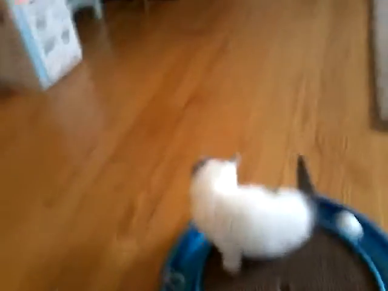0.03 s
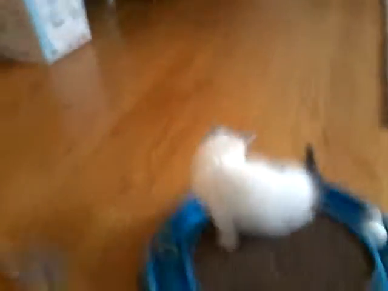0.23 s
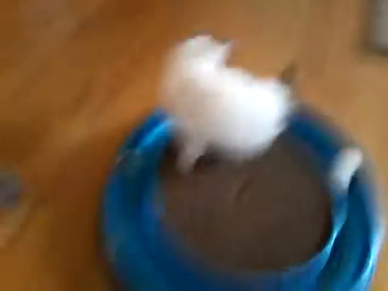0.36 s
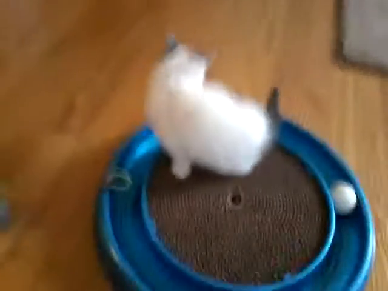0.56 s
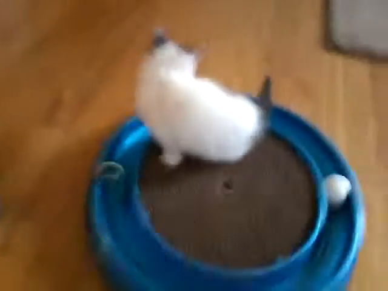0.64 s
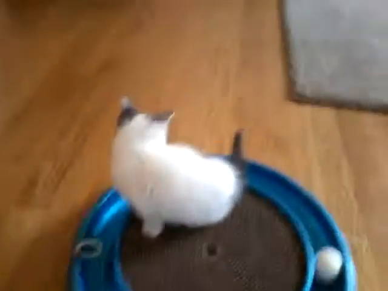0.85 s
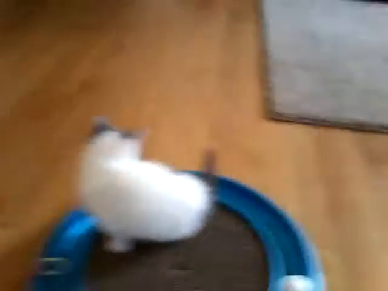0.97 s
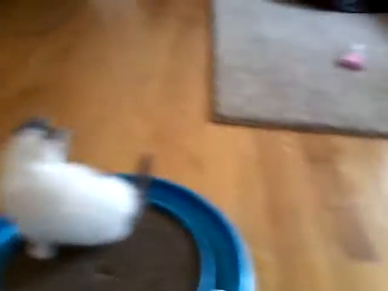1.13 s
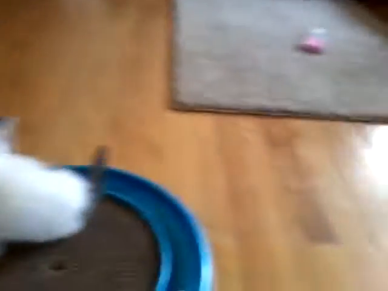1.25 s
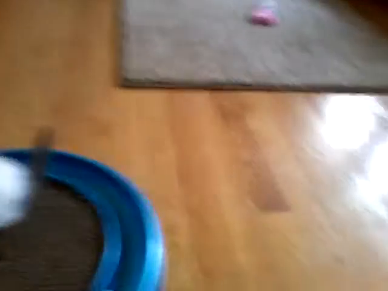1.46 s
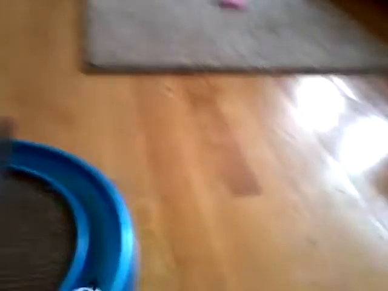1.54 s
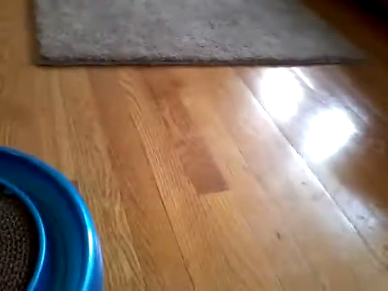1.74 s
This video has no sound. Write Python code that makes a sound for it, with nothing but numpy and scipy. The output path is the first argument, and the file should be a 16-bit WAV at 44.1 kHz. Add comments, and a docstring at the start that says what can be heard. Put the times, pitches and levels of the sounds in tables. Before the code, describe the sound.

Fingers scrape and bump a hand-held camera, then two taps and a ball rolls along plastic track

```python
"""Fingers shift on the case of a hand-held camera: gritty scrapes past the microphone, soft thumps, small ticks.
Then come two light taps on a plastic track, and a hollow ball skids, bounces and rolls off along it.
Underneath lie a thin rising squeak, a faint swelling hiss and a quiet room with a wavering hum.
Friction is shaped noise, blows ring banks of resonances, and squeak and hum are sines."""
import sys
import numpy as np
from scipy import signal
from scipy.fft import rfft, irfft, next_fast_len
from scipy.io import wavfile
from scipy.ndimage import map_coordinates

SR = 44100
rng = np.random.default_rng(int(sys.argv[2]) if len(sys.argv) > 2 else 0)


def to_wav(sig):
    """Store sig (one row per channel, or 1-D mono) as 16-bit WAV at the path in sys.argv[1].

    Samples outside -1..1 are clipped; the rate is SR.
    """
    pcm = np.clip(np.atleast_2d(sig), -1, 1) * 32767
    pcm = np.round(pcm).astype(np.int16)
    wavfile.write(sys.argv[1], SR, pcm.T)  # frames by channels


N = 79380  # length in samples


def amp(db):
    """Decibels to a linear factor."""
    return 10 ** (np.asarray(db) / 20)


def unit(x):
    """Scale to rms 1."""
    return x / np.sqrt(np.mean(x ** 2) + 1e-20)


def noise():
    """White noise for the whole scene."""
    return rng.standard_normal(N)


def along(points, hz):
    """Read (Hz, value) points on a log frequency axis."""
    f, values = np.transpose(points)
    return np.interp(np.log(hz + 1), np.log(f + 1), values)


def curves(rows, outside=-120):
    """One value per sample for each column after the time."""
    s, *columns = np.transpose(rows)
    t = np.arange(N) / SR
    return [np.interp(t, s, column, left=outside, right=outside) for column in columns]


def wobble(rate):
    """A smooth random curve with this many knots a second."""
    knots = rng.standard_normal(int(N * rate / SR) + 4)
    return map_coordinates(knots, [np.arange(N) * rate / SR])


def filtered(x, response):
    """Multiply the spectrum of x by a complex response of frequency."""
    m = next_fast_len(N + SR // 2)
    return irfft(rfft(x, m) * response(np.fft.rfftfreq(m, 1 / SR)), m)[:N]


def coloured(x, spectrum):
    """Shape x by a spectrum, at rms 1."""
    return unit(filtered(x, lambda hz: amp(along(spectrum, hz))))


def resonance(f, centre, width):
    """One causal resonance with gain 1 at its centre."""
    return 1j * f * width / (centre ** 2 - f ** 2 + 1j * f * width)


def grit(per_s, spread_db, share):
    """Friction as tiny slips of uneven size and either sign, mixed by power share with smooth noise."""
    when = rng.random(N) < per_s / SR
    sign = rng.choice([-1, 1], N)
    slips = when * sign * amp(spread_db * noise().clip(-2, 2))
    share = np.clip(share, 0, 1)
    return np.sqrt(share) * unit(slips) + np.sqrt(1 - share) * noise()


CONTACT_S, SOFT_HZ = 0.0011, 7000  # decay of the rough contact; corner of its soft surface


def struck(events, modes, echo_db, echo_hz):
    """Each blow, a brief rough contact with a duller rebound, rings the body's resonances."""
    out, t = np.zeros(N), np.arange(200) / SR
    for s, db, tilt_db, echo_s in events:
        blow = np.zeros(N)
        impact = (t == 0) + .1 * rng.standard_normal(200)
        blow[round(s * SR):][:200] = np.exp(-t / CONTACT_S) * impact

        def contact(f):
            rebound = amp(echo_db) * np.exp(-2j * np.pi * f * echo_s) / (1 + 1j * f / echo_hz) ** 2
            return (1 + 1j * f / SOFT_HZ) ** -4 * (1 + rebound)

        def body(f):
            total = 0
            for k, (centre, width, level) in enumerate(modes):
                # brightness tilts the modes about 2500 Hz; neighbours have opposite sign
                gain = (-1) ** k * amp(level + tilt_db * np.log2(centre / 2500))
                total = total + gain * centre / width * resonance(f, centre, width)
            return total

        ring = filtered(blow, lambda f: contact(f) * body(f))
        out += amp(db) * ring / np.abs(ring).max()
    return out


# Colour of the room tone. Each row: frequency in Hz, relative density in dB per Hz.
AIR_COLOUR = [(12, -25.5), (20, 2.5), (126, -3), (246, -10), (494, -8.5), (653, -19), (888, -15.5),
              (1140, -22), (1510, -20.5), (2290, -24), (6800, -23), (15700, -33)]
# Fade of the finest treble hiss. Each row: time in seconds, level in dB.
FINE_HISS = [(0, -73.5), (.9, -70), (1.0, -88), (1.8, -76)]
# Colour of that treble hiss. Each row: frequency in Hz, relative density in dB per Hz.
FINE_COLOUR = [(7000, -59), (10000, -4.5), (15700, 0.5)]
AIR_DB, HUM_HZ, HUM_DB = -67, 119, -71.5


def air():
    """Room tone and fine hiss are shaped noise; the hum is a sine of wavering level and phase."""
    hum_level = amp(HUM_DB + 2.5 * wobble(12))
    hum = hum_level * np.sin(2 * np.pi * HUM_HZ * np.arange(N) / SR + .8 * wobble(6.7))
    tone = amp(AIR_DB + .8 * wobble(3.2)) * coloured(noise(), AIR_COLOUR)
    fine = amp(curves(FINE_HISS)[0]) * coloured(noise(), FINE_COLOUR)
    return tone + hum + fine


# Swell of the faint hiss. Each row: time in seconds, level in dB, level of its narrow core in dB.
HISS = [(1.1, -85, -93), (1.25, -78.5, -98), (1.4, -74, -84), (1.46, -71, -74), (1.55, -72, -72),
        (1.63, -65, -83)]
# Colour of the broad part. Each row: frequency in Hz, relative density in dB per Hz.
HISS_COLOUR = [(3500, -47.5), (4600, -11.5), (5600, -5.5), (6300, -7.5), (7500, -16), (9500, -55.5)]
HISS_CORE_HZ, HISS_CORE_WIDTH_HZ = 5050, 210


def hiss():
    """A faint hiss swells towards the taps: broad noise around a core through a narrow double resonance."""
    level_db, core_db = curves(HISS)
    core = unit(filtered(noise(), lambda f: resonance(f, HISS_CORE_HZ, HISS_CORE_WIDTH_HZ) ** 2))
    flutter = amp(1.4 * wobble(50))
    broad = coloured(noise(), HISS_COLOUR)
    return flutter * (amp(level_db) * broad + amp(core_db) * core)


# Glide of the squeak. Each row: time in seconds, pitch in Hz, fundamental in dB, octave in dB.
SQUEAK = [(1.28, 2930, -95, -82), (1.305, 2985, -83, -73), (1.325, 3110, -84, -73), (1.345, 3300, -95, -72),
          (1.37, 3380, -92, -74), (1.385, 3480, -79, -74), (1.4, 3620, -75, -78), (1.415, 3780, -90, -95)]


def squeak():
    """A thin, unsteady rising whistle: a sine and its octave on one jittered phase."""
    hz, low_db, high_db = curves(SQUEAK)
    phase = 2 * np.pi * np.cumsum(hz * (1 + 0.0035 * wobble(210))) / SR
    return amp(wobble(82)) * (amp(low_db) * np.sin(phase) + amp(high_db) * np.sin(2 * phase))


# Finger presses on the case. Each row: centre in seconds, peak in dB, pitch in Hz.
THUMPS = [(0.21, -37, 93), (0.218, -33.5, 50), (0.25, -42, 78), (0.261, -37, 69), (0.293, -41.5, 39.3),
          (0.32, -38, 61.3), (0.332, -39.5, 127), (.378, -46, 44.5), (.461, -34, 110), (0.47, -36, 89),
          (0.491, -31.5, 52.5), (.513, -35.5, 140), (0.535, -36.5, 101), (0.606, -34, 76.6),
          (.621, -33, 109), (0.63, -32, 47), (0.658, -35, 42.4), (0.691, -39, 54), (0.743, -40, 49.3),
          (0.781, -27.5, 49), (0.859, -38, 158)]


def thumps():
    """Each press is one soft push of air with a dip on both sides."""
    t = np.arange(N) / SR
    out = np.zeros(N)
    for s, db, hz in THUMPS:
        out += amp(db) * np.cos(2 * np.pi * hz * (t - s)) * np.exp(-(2.1 * hz * (t - s)) ** 2)
    return out


# Fingers rubbing. Each row: time in seconds, bright scrape in dB, duller part relative to it in dB.
SCRAPE = [(0, -63.5, -4.5), (.076, -69, -9), (.108, -66, -0.5), (.116, -61, -5.5), (.176, -50.5, -6),
          (.202, -54, -7), (.214, -42.5, -8), (.228, -36, -6.5), (.25, -41, -7), (.268, -47, -6.5),
          (.284, -58, -2.5), (.306, -59.5, -1.5), (.314, -49.5, -0.5), (.332, -39.5, -5), (.344, -42, -6.5),
          (.352, -25, -15), (.361, -22.5, -25), (.368, -33, -9.5), (.372, -61, 6), (.405, -52.5, -4.5),
          (.436, -60, -1.5), (.474, -54.5, -2), (.486, -46.5, -8.5), (.512, -43.5, -3), (.534, -33, -10.5),
          (.544, -44, -4), (.552, -56.5, -2), (.6, -57, -6.5), (.634, -46, -6.5), (.652, -40, 0.5),
          (.667, -45.5, 3), (.671, -62.5, -9.5), (.746, -62.5, 0), (.76, -62, 9), (.776, -64.5, 3),
          (.816, -71.5, 4), (.98, -79.5, 1)]
# Grip shifting. Each row: time in seconds, rumble level in dB, low rustle level in dB.
GRIP = [(0.0, -49.5, -64.5), (0.026, -69, -59.5), (0.038, -56.5, -59), (0.14, -62, -58), (0.158, -67, -50),
        (0.192, -48.5, -58), (0.214, -48.5, -50.5), (0.288, -49.5, -61), (0.33, -40.5, -46),
        (0.36, -53.5, -56.5), (0.436, -44.5, -59.5), (0.454, -55.5, -54.5), (0.502, -48, -60),
        (0.51, -48, -50), (0.556, -43, -53.5), (0.57, -55.5, -63.5), (0.656, -41.5, -53.5),
        (0.686, -47, -69), (0.704, -56, -54.5), (0.768, -42, -52.5), (0.832, -59, -68.5),
        (0.858, -48, -61.5), (0.88, -58, -67), (0.908, -60.5, -53), (0.98, -67, -75)]
# Colours of bright scrape, dull scrape, rumble and rustle.
# Each row: frequency in Hz, relative density in dB per Hz.
PORT_COLOUR = [(3500, -38.5), (5000, -19), (6200, -4), (7000, -3.5), (8100, -2.5), (9300, -11.5),
               (10800, -22), (12500, -32), (15700, -39.5)]
DULL_COLOUR = [(500, -120), (900, -17.5), (2000, -7.5), (3500, -3.5), (5000, -8), (9000, -16.5),
               (15000, -31)]
RUMBLE_COLOUR = [(12, -25), (20, 5.5), (38, -5.5), (102, -6.5), (205, -22), (239, -12), (260, -20),
                 (340, -55.5), (570, -120)]
RUSTLE_COLOUR = [(120, -30.5), (200, 1.5), (300, -2.5), (365, 4), (423, -7), (510, -2.5), (1400, -19),
                 (3080, -120)]
GRAINS_PER_S, GRAIN_SPREAD_DB, GRAIN_SHARE = 3400, 2, 0.55
# the microphone port's ring: level at the hardest scrape, and dB of ring per dB of scrape
WHISTLE_HZ, WHISTLE_WIDTH_HZ, WHISTLE_DB, WHISTLE_GROWS = 6900, 700, -25, 1.3


def fingers():
    """Skin slips over the case: gritty scrape rings the port more the harder it rubs, over rumble and rustle."""
    scrape_db, dull_db = curves(SCRAPE)
    rumble_db, rustle_db = curves(GRIP)
    skin = grit(GRAINS_PER_S, GRAIN_SPREAD_DB, GRAIN_SHARE)
    rub = coloured(skin, PORT_COLOUR) + amp(dull_db) * coloured(skin, DULL_COLOUR)
    scrape = amp(scrape_db + 1.5 * wobble(400) + 0.89 * wobble(70)) * rub
    ring = filtered(grit(900, 3.3, 0.64), lambda f: resonance(f, WHISTLE_HZ, WHISTLE_WIDTH_HZ) ** 2)
    whistle = amp(WHISTLE_DB + WHISTLE_GROWS * (scrape_db - scrape_db.max())) * unit(ring)
    rumble = amp(rumble_db) * coloured(noise(), RUMBLE_COLOUR)
    rustle = amp(rustle_db) * coloured(grit(300, 4.0, 0.46), RUSTLE_COLOUR)
    return scrape + whistle + rumble + rustle


# Ticks of the case, levels before envelope and case.
# Each row: start in seconds, dull part in dB, its pitch in Hz, bright part in dB, its pitch in Hz.
TICKS = [(.0372, -49.5, 830, -52, 7000), (.0598, -45.5, 1800, -49, 7000), (.0905, -44, 1270, -65, 7000),
         (.157, -43.5, 890, -60, 7000), (.214, -30.5, 2400, -30, 7400), (.3295, -41, 2800, -29, 6560),
         (.4145, -43, 2470, -31, 8800), (.4578, -43.5, 2010, -40, 6500), (.5116, -42.5, 1170, -35, 7000),
         (.6679, -25.5, 3300, -41, 6400), (.669, -35.5, 2560, -9, 7070), (.6958, -41, 1800, -38, 6000),
         (.7589, -47, 2970, -32, 6070), (.7633, -42.5, 1470, -35, 4540), (.7694, -38, 2540, -31.5, 7000),
         (.7729, -24.5, 3020, -26.5, 5720), (.8575, -36.5, 2680, -43.5, 6030),
         (.8916, -45.5, 2280, -60, 6000), (.901, -52, 1220, -52, 3950), (1.0597, -60.5, 864, -75.5, 4940),
         (1.086, -59, 980, -61.5, 5000), (1.1806, -57.5, 1000, -71.5, 5010),
         (1.2263, -53.5, 862, -55.5, 6000), (1.3077, -62, 1096, -73.5, 5000),
         (1.4672, -55.5, 930, -72, 4980), (1.5146, -52, 1190, -69, 3500)]
# Ring of the case after a tick. Each row: frequency in Hz, width in Hz, level in dB before a gain of 3.
CASE = [(440, 94, 2), (851, 110, -13)]
DULL_CYCLES, BRIGHT_CYCLES = 0.43, 1.17  # envelope time scale in cycles of the pitch
TAIL_S, TAIL_DB = 0.0079, -4.5  # decay and level of a short noisy tail on each tick


def ticks():
    """Short soft-edged clicks: a dull, wavering knock with a noisy tail rings the case, beside a bright ring."""
    dull, bright, t = np.zeros(N), np.zeros(N), np.arange(700) / SR

    def edge(hz, cycles):
        x = t * hz / cycles
        return x ** 2.35 * np.exp(1.5 - 1.79 * x)

    for s, dull_db, dull_hz, bright_db, bright_hz in TICKS:
        bend, rough = rng.standard_normal((2, 700))
        waver = 0.12 * np.cumsum(bend)

        def knock(hz):
            return edge(hz, DULL_CYCLES) * np.sin(2 * np.pi * hz * t + waver)

        click = knock(dull_hz) + 0.23 * knock(0.37 * dull_hz)
        smear = rough * np.exp(-t / TAIL_S)
        tail = np.convolve(click, smear / np.linalg.norm(smear))[:700]
        ring = edge(bright_hz, BRIGHT_CYCLES) * np.sin(2 * np.pi * bright_hz * t)
        here = slice(round(s * SR), round(s * SR) + 700)
        dull[here] += amp(dull_db) * (click + amp(TAIL_DB) * tail)
        bright[here] += amp(bright_db) * ring

    def case(f):
        return 1.19 + 3 * sum(amp(db) * resonance(f, centre, width) for centre, width, db in CASE)

    return bright + filtered(dull, case)


# Decay of the room. Each row: frequency in Hz, time to fall 60 dB in seconds.
ROOM = [(300, 1), (2000, 0.53), (9000, 0.37)]


def room(x):
    """Noise as the room's answer, slightly delayed, each frequency dying at its own speed."""
    hz, t, z = signal.stft(rng.standard_normal(SR // 3), SR, nperseg=256)
    decay = amp(-60 * t / along(ROOM, hz)[:, None])
    tail = signal.istft(z * decay, SR, nperseg=256)[1]
    late = np.pad(x, (200, 0))  # delay in samples
    return signal.fftconvolve(late, tail / np.linalg.norm(tail))[:N]


# Taps on the track.
# Each row: start in seconds, peak in dB, brightness in dB per octave, rebound delay in seconds.
TAPS = [(1.5535, -25.5, 0.9, 0.00278), (1.6277, -23.5, 12.5, 0.003)]
# Resonances of the plastic track. Each row: frequency in Hz, width in Hz, level in dB before brightness
# and the gain of a narrow mode.
TRACK = [(420, 94, 8.5), (790, 140, -5.5), (1340, 200, -3.5), (2795, 390, 2), (3840, 360, -3),
         (4300, 620, 0), (5320, 550, 2.5), (6920, 620, -5), (8000, 670, -11.5)]
REBOUND_DB = -6
BROADER = 1.8  # the room is fed by a copy of the taps with broader resonances and a weaker rebound


def taps():
    """Two blows ring the plastic track: the direct sound, and a broader copy that feeds the room."""
    direct = struck(TAPS, TRACK, REBOUND_DB, echo_hz=14950)
    broad = struck(TAPS, np.multiply(TRACK, [1, BROADER, 1]), REBOUND_DB - 14, echo_hz=15000)
    return direct, broad


# Bounces of the ball. Each row: start in seconds, peak in dB, brightness in dB per octave.
BOUNCES = [(1.7055, -35, -1.5), (1.7223, -39.5, -2.8), (1.735, -51, 3), (1.745, -56, 5), (1.7665, -47.5, 8),
           (1.786, -48, 7)]
# Resonances of the hollow ball. Each row: frequency in Hz, width in Hz for a bounce,
# level in dB before the tilt of bounce or roll.
BALL = [(895, 190, 3), (1140, 190, 4), (1370, 220, -3), (2250, 250, -8), (4590, 220, 3), (5680, 400, -9)]
# Fades of the roll, the skid and the track droning on the floor. Each row: time in seconds, level in dB.
ROLL = [(1.7, -69), (1.712, -58), (1.74, -56), (1.8, -63.5)]
SKID = [(1.62, -85), (1.634, -49), (1.655, -52), (1.69, -55.5), (1.72, -59), (1.76, -63), (1.8, -62)]
DRONE = [(1.545, -101), (1.56, -53.5), (1.62, -60.5), (1.65, -57), (1.7, -67.5), (1.75, -59.5), (1.8, -73)]
# Colours of skid and drone. Each row: frequency in Hz, relative density in dB per Hz.
SKID_COLOUR = [(700, -57), (1100, -11), (2500, -18), (4000, -3.5), (5500, 0), (7000, 1.5), (8800, -14.5),
               (15700, -37)]
DRONE_COLOUR = [(15, -38), (25, -7), (108, 0.5), (220, -11.5), (367, -3.5), (507, -13.5), (620, -4.5),
                (680, -6), (1000, -19), (2200, -120)]
BALL_REBOUND_S, BALL_REBOUND_DB = .0026, 5


def ball():
    """A skid of fine hiss, hollow bounces and a rough roll in the ball's resonances; the track drones."""
    (roll_db,), (skid_db,), (drone_db,) = curves(ROLL), curves(SKID), curves(DRONE)

    def shell(f):
        # the roll has modes of 2.5 widths, darker by 5 dB per octave
        return sum(amp(db - 5.0 * np.log2(centre / 1200)) * resonance(f, centre, 2.5 * width)
                   for centre, width, db in BALL)

    roll = amp(roll_db + 1.75 * wobble(90)) * unit(filtered(grit(350, 3.5, .6), shell))
    skid = amp(skid_db + 1.0 * wobble(60)) * coloured(grit(583, 3.8, 0.32), SKID_COLOUR)
    bounce_events = [(*row, BALL_REBOUND_S) for row in BOUNCES]
    bounces = struck(bounce_events, BALL, BALL_REBOUND_DB, echo_hz=1800)
    drone = amp(drone_db + 2.8 * wobble(30.2)) * coloured(noise(), DRONE_COLOUR)
    return bounces, roll + skid + drone


ROOM_DB = -9.5


def scene():
    """Taps and bounces also excite the room; every other layer is added dry."""
    bounces, rolling = ball()
    direct, broad = taps()
    echo = amp(ROOM_DB) * room(broad + 0.53 * bounces)
    toy = direct + bounces + echo + rolling
    handling = fingers() + thumps() + ticks()
    return (toy + handling + squeak() + hiss() + air())[None]


TOP_HZ = 15830


def record(dry):
    """The camera keeps nothing above its band limit."""
    return filtered(dry[0], lambda hz: hz < TOP_HZ)[None]


dry = scene()
out = record(dry)
to_wav(out)
```